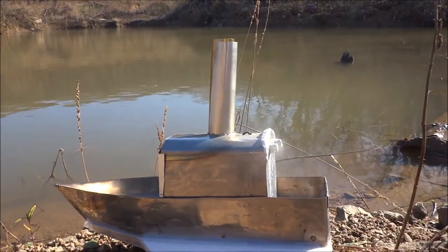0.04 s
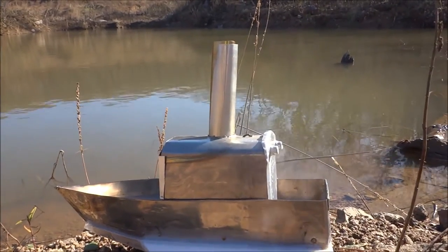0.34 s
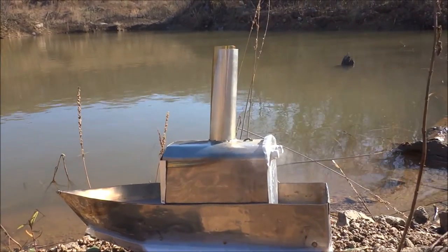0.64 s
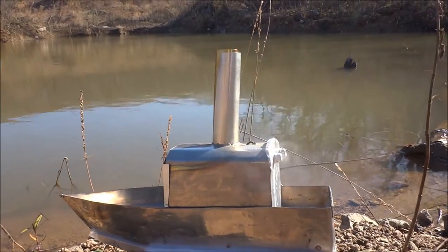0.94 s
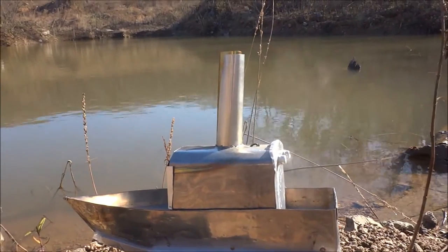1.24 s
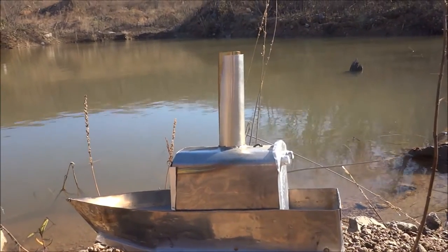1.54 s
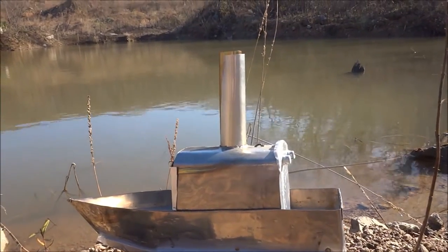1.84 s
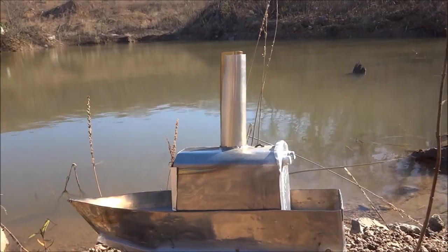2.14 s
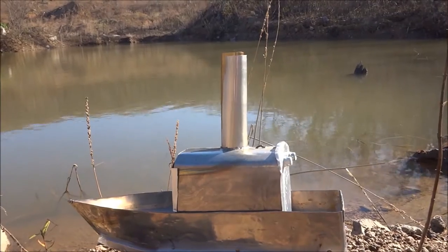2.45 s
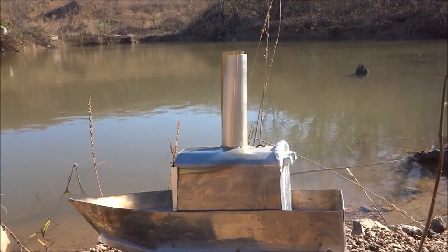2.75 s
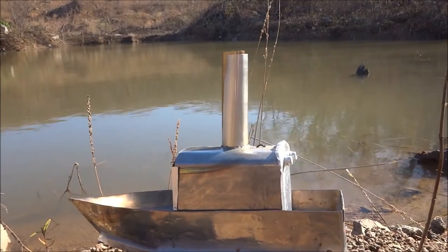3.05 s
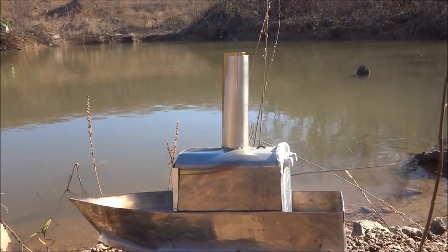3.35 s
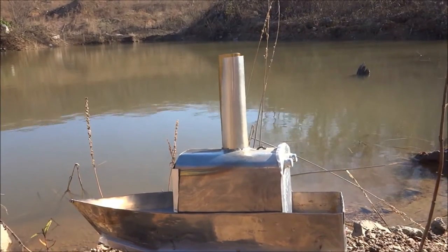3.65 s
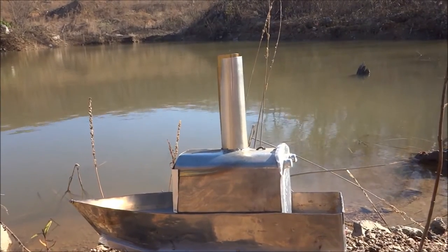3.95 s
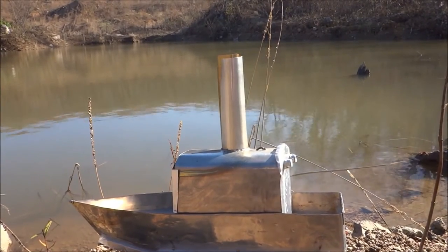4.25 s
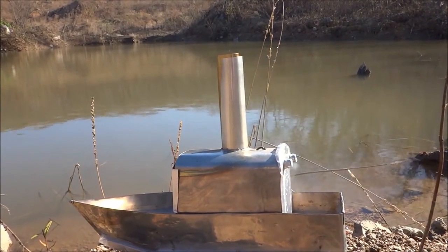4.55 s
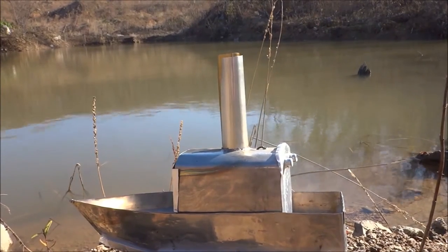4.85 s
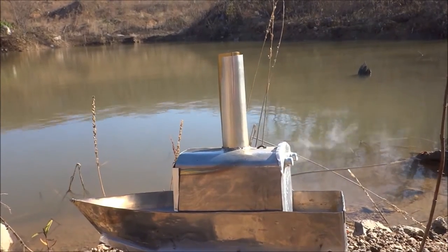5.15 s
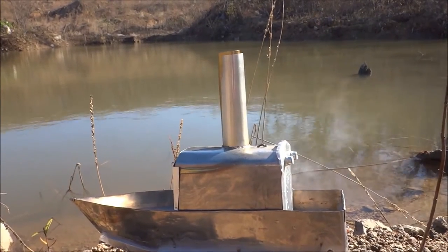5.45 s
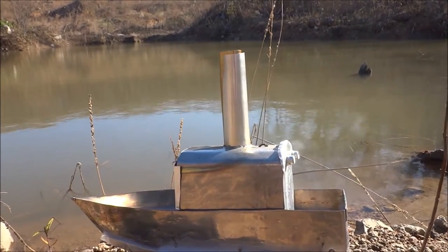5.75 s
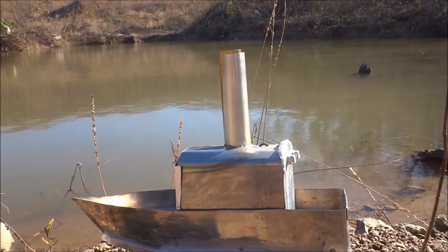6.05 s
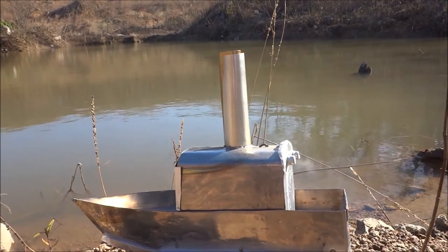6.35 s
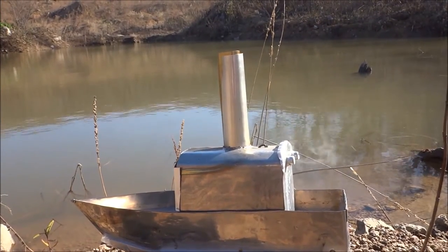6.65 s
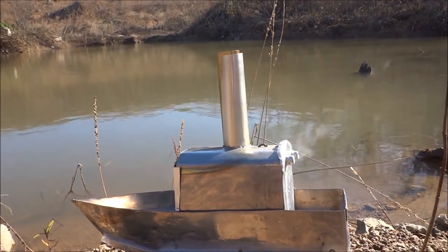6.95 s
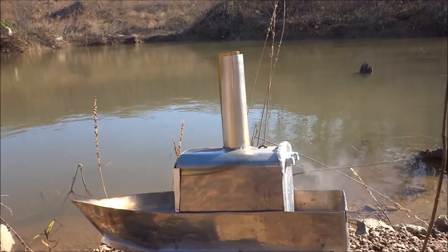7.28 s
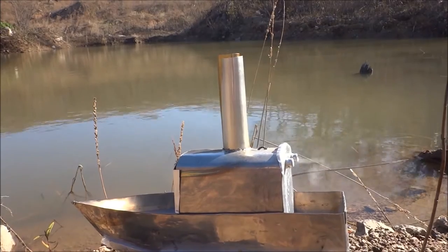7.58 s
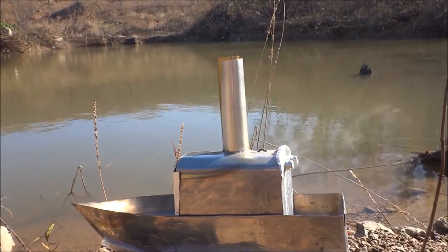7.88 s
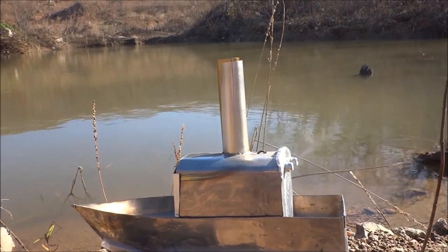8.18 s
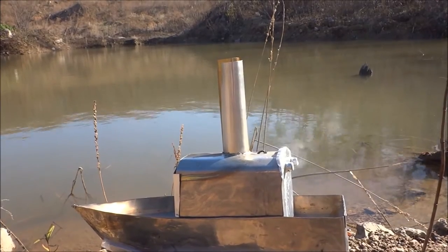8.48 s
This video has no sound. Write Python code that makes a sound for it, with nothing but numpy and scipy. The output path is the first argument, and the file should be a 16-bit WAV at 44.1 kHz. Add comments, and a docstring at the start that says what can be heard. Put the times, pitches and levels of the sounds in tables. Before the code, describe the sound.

Outdoors by the water, a faint, high steam hiss comes steadily from a model boat's boiler, with a slightly hollow sputter, tiny squeaks and occasional sharp spits. Low gusts of wind buffet the microphone, strongest in the first half and again after a brief lull. Near the end the wind drops, the valve spits in a quick cluster alongside one soft scuff, and the hiss continues.

```python
"""Leaking model boiler on a windy river bank.

Wet steam jets from the valve: a thin, fizzing hiss that eases as the pressure falls, with two hollow
resonances, faint water-film squeaks and a few sharp spits. Gusts rumble and eddies thump on the two
microphone ports of a hand-held camera. Underneath: open-air noise, a thin electronic whine, one scuff."""
import sys
import numpy as np
from scipy import signal
from scipy.fft import rfft, irfft
from scipy.io import wavfile
from scipy.ndimage import uniform_filter1d

SR = 44100
rng = np.random.default_rng(int(sys.argv[2]) if len(sys.argv) > 2 else 0)


def wav_record(signal):
    """Record a signal, one row per channel, as 16-bit PCM in the file named by sys.argv[1]."""
    frames = np.transpose(np.atleast_2d(signal))
    bounded = np.clip(frames, -1, 1)
    # unit amplitude maps onto the largest positive 16-bit level
    quanta = np.round(bounded * 32767).astype(np.int16)
    wavfile.write(sys.argv[1], SR, quanta)


N = 384552
TIME_S = np.arange(N) / SR

# source spectra: (frequency [Hz], relative density [dB])
JET_SPECTRUM = [(3000, -22), (3950, -10), (4500, -0.5), (5000, -1.5), (5350, -3), (5750, 0), (6050, 4.5),
                (6400, -0.5), (6900, 3.5), (7450, -0.5), (8100, -3.5), (8600, 0.5), (9000, -0.5),
                (9600, 4.5), (10100, -3.5), (10650, -6), (11000, -12.5), (12000, -55)]
CAVITY_SPECTRUM = [(1290, -19.5), (2200, -10.5), (2380, -13), (2640, 1), (2990, 1), (3340, 3.5),
                   (3940, -10), (4100, -27.5), (5330, -43), (9020, -120)]
LOW_HOLLOW_SPECTRUM = [(900, -22), (1100, -5), (1220, 7), (1330, 2.5), (1450, -8.5), (1650, -22.5)]
AIR_SPECTRUM = [(100, -12), (200, -0.5), (330, 3.5), (480, 1), (630, -3), (860, -1.5), (1030, -11),
                (1300, -12.5), (1570, -18.5), (1730, -5.5), (1950, -18.5), (2300, -23), (3200, -53)]
BREEZE_SPECTRUM = [(10, -34), (25, -4.5), (55, 0), (90, -6.5), (150, -15.5), (400, -51)]
RUMBLE_SPECTRUM = [(10, -30), (22, -19), (50, -3), (110, -0.5), (155, -3.5), (230, -25.5), (400, -63)]
FLUTTER_SPECTRUM = [(80, -26), (130, -5.5), (190, 2), (290, -1.5), (450, -8.5), (700, -28), (1100, -42.5),
                    (2000, -56)]
CRACK_SPECTRUM = [(1200, -22), (2400, -6.5), (3400, 3.5), (4800, -10.5), (6200, 3), (7400, 2.5), (9000, -4),
                  (11000, -10), (13000, -31)]
SCUFF_SPECTRUM = [(400, -20), (800, -3), (1700, 12), (2400, -4), (4000, -23)]
# leak at the ports: (frequency [Hz], coherence [0-1], left minus right [dB])
STEAM_STEREO = [(2210, 0.58, -3), (2940, 0.93, -3.5), (3530, 0.68, 0), (3900, 0.6, -1), (4460, 0.67, -2.5),
                (6070, 0.83, -3), (7060, 0.69, -0.5), (8140, 0.8, -10.5), (8930, 0.73, 0.5),
                (8940, 0.1, 6.5), (10300, 0.9, -0.5)]
# air, wind at the ports: (frequency [Hz], coherence [0-1], left minus right [dB], right lead [rad])
AIR_STEREO = [(300, 0.59, 0, -5), (583, 0.04, -1, 2), (837, 0.62, -2, 3.5), (1000, 0, -5, 1),
              (1240, 0.87, -3, 2.32), (1474, 0, -14, -2), (1780, 0.17, -1, 1.8), (2180, 0.05, 15, 0)]
WIND_STEREO = [(40, .9, 0, 0), (65, .82, .3, .05), (110, .72, .7, .5), (190, .62, .8, 1.25),
               (320, .86, 1.2, 2), (800, .9, -.5, 2.2)]
# valve cavity envelope: (time [s], level [dB])
CAVITY_LEVELS = [(0, -55.0), (1.85, -55.5), (2.3, -59.5), (2.7, -56.5), (3.4, -58), (3.85, -57),
                 (4.55, -60.0), (5.0, -57.5), (5.4, -59.5), (5.9, -57), (6.8, -57.5), (8.72, -58.5)]
# water-film whistles: (pitch [Hz], rate [1/s], relative level [dB])
FILM_SQUEAKS = [(3018, 24, -12.5), (6050, 7, -18)]
# gusts on the ports: (start [s], hold [s], rumble level [dB])
WIND_GUSTS = [(0.033, 0.14, -48), (0.2, 0.26, -52.5), (0.774, 0.28, -51.5), (1.056, .42, -40),
              (1.509, 0.21, -34), (1.74, 0.22, -41), (2.051, 0.098, -40.5), (2.222, 0.18, -43.5),
              (2.459, .19, -32.5), (2.817, 0.16, -41.5), (3.194, .77, -33), (3.363, .16, -30),
              (4.232, 0.18, -46), (4.977, 0.075, -37.5), (5.097, 0.17, -44.5), (5.377, .16, -47),
              (5.682, 0.025, -44), (5.818, 0.48, -35.5), (6.123, 0.061, -29), (6.356, .08, -33),
              (6.51, .03, -45), (7.5, 0.039, -45), (7.735, 0.17, -51), (8.177, 0.5, -50.5)]
# bursting water plugs: (time [s], relative crack level [dB], knock level [dB], crack decay [ms])
WATER_SPITS = [(0.7153, -30, -26, 1.2), (1.497, -30.5, -67, 1.4), (2.1531, -40, -70, 1.1),
               (3.178, -39, -59, 1.6), (3.6758, -39.5, -70, 1.1), (3.9436, -34.5, -39.5, 2.6),
               (7.293, -39, -56, 4.2), (7.31, -46, -58, 5.3), (7.3435, -40.5, -43.5, 2)]
# single vortices: (time [s], relative peak [dB], centre frequency [Hz])
WIND_EDDIES = [(1.109, -29, 152), (1.271, -25, 210), (1.302, -23, 151), (1.390, -21, 117),
               (1.535, -22, 182), (1.605, -17, 91), (1.639, -13, 185), (1.794, -28, 153),
               (1.882, -28.5, 165), (2.107, -20.5, 160), (2.302, -20, 132), (2.475, -29.5, 230),
               (2.561, -19.5, 138), (2.642, -11, 220), (2.91, -25.5, 220), (3.059, -28.5, 121),
               (3.234, -13.5, 280), (3.334, -21, 213), (3.373, -17, 120), (3.411, -14.5, 137),
               (3.465, -17.5, 255), (3.633, -19, 197), (3.767, -23.5, 270), (3.837, -16.5, 185),
               (3.902, -24, 182), (3.962, -15.5, 150), (4.01, -20, 111), (4.616, -26.5, 60),
               (4.75, -29, 50), (5.837, -18, 183), (6.006, -19.5, 122), (6.060, -25, 150),
               (6.163, -14, 188), (6.248, -11.5, 179), (6.363, -14.5, 109), (6.365, -18.5, 423),
               (7.544, -35.5, 151), (8.326, -34, 101), (8.43, -36.5, 450), (8.501, -29, 111),
               (8.53, -27.5, 171)]


def undb(db):
    """Decibels to gain."""
    return 10 ** (np.asarray(db) / 20)


def unit(x):
    """Scale to rms 1."""
    return x / np.sqrt(np.mean(x ** 2))


def bins(table):
    """Value columns of a frequency table at every FFT bin."""
    hz, *columns = np.transpose(table)
    log_hz = np.log(np.maximum(np.arange(N // 2 + 1) * SR / N, 1))
    return [np.interp(log_hz, np.log(hz), column) for column in columns]


def colour(x, spectrum):
    """Filter by a spectrum table; white noise keeps its power."""
    return irfft(rfft(x) * unit(undb(bins(spectrum)[0])), N)


def walk(rate_hz):
    """Random steps, smoothed twice; rms 1."""
    step = max(int(SR / rate_hz), 1)
    held = np.repeat(rng.standard_normal(N // step + 1), step)
    return unit(uniform_filter1d(uniform_filter1d(held, step), step)[:N])


def at_ports(pair, stereo):
    """Mix two unrelated signals to left and right by a stereo table."""
    coherence, pan_db, *lead_rad = bins(stereo)
    mid, side = rfft(pair) * np.sqrt([1 + coherence, 1 - coherence])
    left = (mid + side) * undb(pan_db / 2)
    right = (mid - side) * undb(-pan_db / 2) * np.exp(1j * sum(lead_rad))
    return irfft(np.array([left, right]), N)


def noise(spectrum, stereo):
    """Coloured stereo noise, rms 1."""
    return unit(colour(at_ports(rng.standard_normal((2, N)), stereo), spectrum))


def even(x, span_s):
    """Level out the slow swells of a stereo noise."""
    power = uniform_filter1d(np.mean(x ** 2, axis=0), int(span_s * SR))
    return x / np.sqrt(power + 1e-12)


def cavity_db():
    """Valve cavity level at every sample."""
    return np.interp(TIME_S, *np.transpose(CAVITY_LEVELS))


def shimmer(x, depth_db=0.5):
    """Jet wobble: neighbouring bands swell and fade independently."""
    centres_hz = np.geomspace(3500, 11000, 7)
    hz = np.arange(N // 2 + 1) * SR / N
    spectrum = rfft(x)
    bands = [irfft(spectrum * np.interp(hz, centres_hz, share), N) for share in np.eye(len(centres_hz))]
    return sum(band * undb(depth_db * walk(9)) for band in bands)


def jet(fizz_db=-12, droplets_per_s=500, spread_db=6):
    """Steam jet hiss with the fizz of bursting droplets; rms 1."""
    droplets = (rng.random((2, N)) < droplets_per_s / SR) * rng.standard_normal((2, N))
    droplets *= undb(spread_db * np.minimum(rng.exponential(size=(2, N)), 4))
    fizz = unit(colour(at_ports(droplets, STEAM_STEREO), JET_SPECTRUM))
    return unit(shimmer(noise(JET_SPECTRUM, STEAM_STEREO) + undb(fizz_db) * fizz))


def squeaks(length_s=0.022, scatter=0.0563, glide=0.027):
    """Short whistles as the water film in the valve thins and breaks."""
    t = np.arange(int(length_s * SR)) / SR
    out = np.zeros(N)
    for hz, per_s, db in FILM_SQUEAKS:
        train = np.zeros(N + len(t))
        for when, detune, slide, size in rng.random((int(per_s * N / SR) + 1, 4)):
            pitch_hz = hz * (1 + scatter * (2 * detune - 1))
            phase = 2 * np.pi * pitch_hz * (t + glide * (slide - 0.5) * t ** 2 / length_s)
            start = int(when * N)
            train[start:start + len(t)] += size * np.hanning(len(t)) * np.sin(phase)
        out += undb(db) * unit(train[:N])
    return at_ports(np.array([out, np.zeros(N)]), STEAM_STEREO)


def steam(settled_db=-54.2, excess_db=4, pressure_decay_s=1.97, flicker_db=0.5, sputter_db=1.32):
    """Valve leak: the jet eases with boiler pressure; the cavity sputters and squeaks."""
    hiss = jet()
    hollow = noise(CAVITY_SPECTRUM, STEAM_STEREO) * undb(0.3 + sputter_db * walk(45))
    hiss_db = settled_db + excess_db * np.exp(-TIME_S / pressure_decay_s) + flicker_db * walk(25)
    return hiss * undb(hiss_db) + (hollow + squeaks()) * undb(cavity_db())


def low_hollow(offset_db=-4.5, swell_db=2):
    """The steam leak's lower hollow resonance, swelling with the valve cavity."""
    resonance = noise(LOW_HOLLOW_SPECTRUM, AIR_STEREO)
    return resonance * undb(cavity_db() + offset_db + swell_db * walk(14))


def open_air(start_db=-58.5, fall_db_per_s=0.3, waver_db=2.43):
    """Diffuse river-bank noise, slowly fading."""
    air_db = start_db - fall_db_per_s * TIME_S
    return noise(AIR_SPECTRUM, AIR_STEREO) * undb(air_db + waver_db * walk(9))


def whine(tone_hz=9750, tone_db=-71.5, tick_hz=50, buzz_db=-67, ring_hz=9500, width_hz=500):
    """Camera electronics: a thin tone and a tick train ringing near it."""
    ticks = np.zeros(N)
    ticks[::int(SR / tick_hz)] = 1
    resonance = signal.iirpeak(ring_hz, ring_hz / width_hz, fs=SR)
    buzz = unit(signal.lfilter(*resonance, ticks))
    tone = unit(np.sin(2 * np.pi * tone_hz * TIME_S))
    return undb(tone_db) * tone + undb(buzz_db) * buzz


def gust_power(lull_db=-54.5, rise_s=0.023, fall_s=0.03, trail_db=-11.5, trail_s=0.15):
    """Gusts rise over a lull, hold and drop, trailed by slack air."""
    power = undb(lull_db) ** 2
    for start_s, hold_s, db in WIND_GUSTS:
        before_s = np.clip(start_s - TIME_S, 0, 1)
        after_s = np.clip(TIME_S - start_s - hold_s, 0, 2)
        fall = np.maximum(np.exp(-after_s / fall_s), undb(trail_db) * np.exp(-after_s / trail_s))
        power += (undb(db) * np.exp(-before_s / rise_s) * fall) ** 2
    return power


def wind_levels_db(strong_db=-33, flutter_db=-40, slope=1.34, wake_db=-13, wake_s=0.014, split_hz=215):
    """Low and high wind envelopes: flutter grows faster than rumble; each eddy adds a short wake."""
    low_power = gust_power()
    high_power = undb(flutter_db + slope * (10 * np.log10(low_power) - strong_db)) ** 2
    offsets = np.arange(-SR // 10, SR // 10)
    for at_s, db, hz in WIND_EDDIES:
        wake = undb(db + wake_db) ** 2 * np.exp(-(offsets / SR / wake_s) ** 2)
        high_share = 1 / (1 + (split_hz / hz) ** 4)
        span = int(at_s * SR) + offsets
        low_power[span] += (1 - high_share) * wake
        high_power[span] += high_share * wake
    return 10 * np.log10(low_power), 10 * np.log10(high_power)


def wind(gust_knee_db=-42, hard_knee_db=-35, knee_width_db=4, ragged_db=4,
         soft_hz=220, soft_db=-3, puff_db=3):
    """Turbulence on the ports: harder gusts have smaller eddies and reach higher."""
    low_db, high_db = wind_levels_db()
    # a breeze throbs, a gust rumbles an octave higher
    gust_share = 1 / (1 + np.exp((gust_knee_db - low_db) / knee_width_db))
    breeze = even(noise(BREEZE_SPECTRUM, WIND_STEREO), span_s=0.136)
    rumble = even(noise(RUMBLE_SPECTRUM, WIND_STEREO), span_s=0.089)
    lows = np.sqrt(gust_share) * rumble + np.sqrt(1 - gust_share) * breeze
    # flutter keeps its top only in hard, ragged flaps
    force = 1 / (0.5 + np.exp((hard_knee_db - high_db + ragged_db * walk(110)) / knee_width_db))
    hard = even(noise(FLUTTER_SPECTRUM, WIND_STEREO), span_s=0.069)
    lowpass = signal.butter(2, soft_hz, fs=SR, output="sos")
    soft = unit(signal.sosfiltfilt(lowpass, hard)) * undb(soft_db)
    flutter = force * hard + (1 - force) * soft
    # weak wind arrives in puffs
    puffs = undb(puff_db * (1 - force) * walk(35))
    return puffs * (lows * undb(low_db) + flutter * undb(high_db + 0.5))


def spits(knock_hz=1230, knock_s=0.0016, overtone_gain=0.14, overtone_ratio=2.66):
    """Water plugs burst at the valve: a bright crack, some with a dead two-cycle knock."""
    t = np.arange(SR // 20) / SR
    phase = 2 * np.pi * knock_hz * t
    partials = np.sin(phase) + overtone_gain * np.sin(overtone_ratio * phase)
    knock = -partials * np.exp(-np.pi * (t / knock_s - 1) ** 2)
    cracks, knocks = np.zeros((2, N)), np.zeros(N)
    for at_s, crack_db, knock_db, decay_ms in WATER_SPITS:
        span = slice(int(at_s * SR), int(at_s * SR) + len(t))
        spray = np.sign(rng.standard_normal((2, len(t))))
        cracks[:, span] += undb(crack_db) * np.exp(-t * 1000 / decay_ms) * spray
        knocks[span] += undb(knock_db) * knock
    return colour(at_ports(cracks, STEAM_STEREO), CRACK_SPECTRUM) / np.sqrt(2) + knocks


def eddies(gain_db=-1, crossing_s=0.0009):
    """Each tight vortex gives one pressure swing, right port first."""
    out = np.zeros((2, N))
    offsets = np.arange(-SR // 40, SR // 40)
    t = offsets / SR + np.array([[-crossing_s], [crossing_s]]) / 2
    for at_s, db, hz in WIND_EDDIES:
        phase_squared = (np.pi * hz * t) ** 2
        swing = (1 - 2 * phase_squared) * np.exp(-phase_squared)
        out[:, int(at_s * SR) + offsets] += undb(db + gain_db) * swing
    return out


def scuff(at_s=7.33, half_width_s=0.071, level_db=-61, grain_db=3):
    """One soft, grainy midrange scuff."""
    swell = np.exp(-((TIME_S - at_s) / half_width_s) ** 2)
    return noise(SCUFF_SPECTRUM, AIR_STEREO) * swell * undb(level_db + grain_db * walk(200))


def scene():
    """Boiler, bank, wind and whine, in stereo."""
    return steam() + spits() + scuff() + wind() + eddies() + open_air() + low_hollow() + whine()


def record(dry):
    """The camera's steep treble cut."""
    cutoff_hz = 11060
    return signal.sosfilt(signal.ellip(12, 0.1, 80, cutoff_hz, fs=SR, output="sos"), dry)


dry = scene()
out = record(dry)
wav_record(out)
```